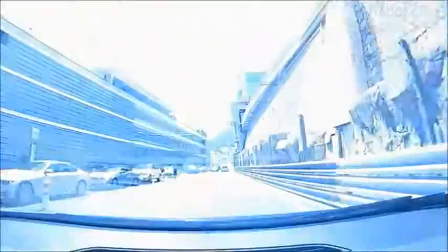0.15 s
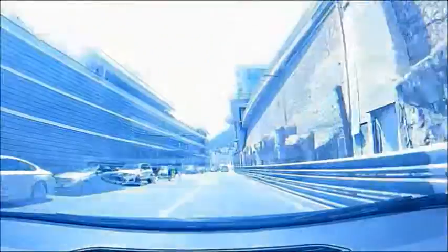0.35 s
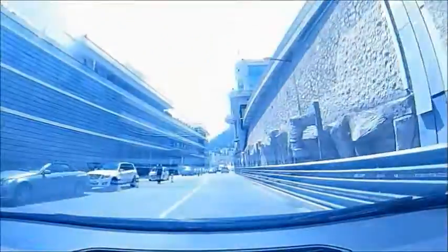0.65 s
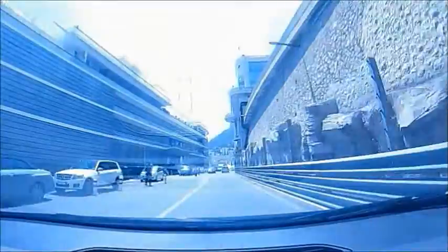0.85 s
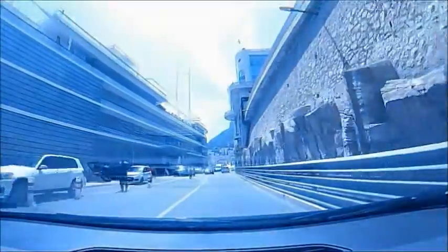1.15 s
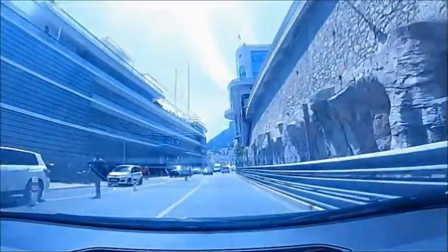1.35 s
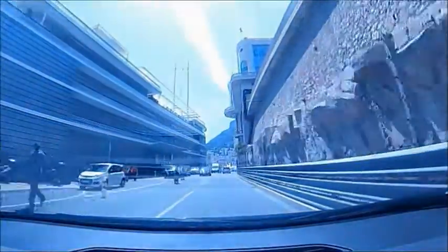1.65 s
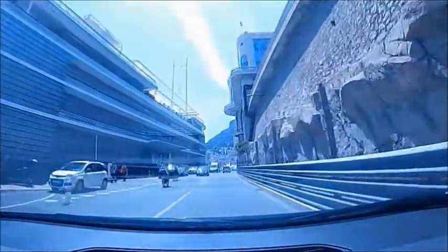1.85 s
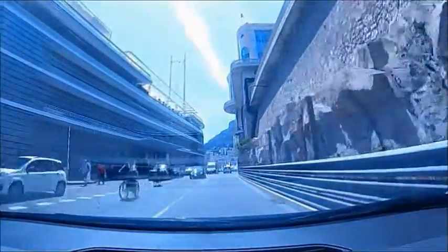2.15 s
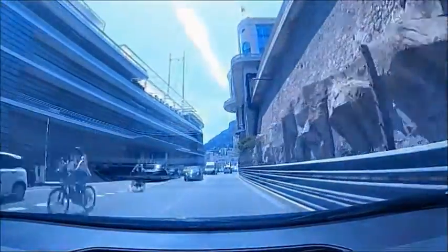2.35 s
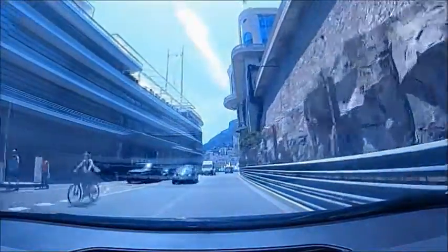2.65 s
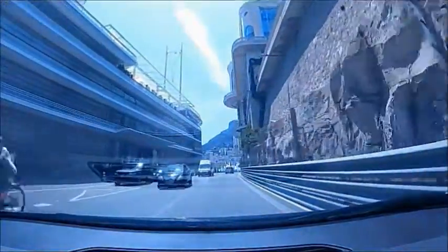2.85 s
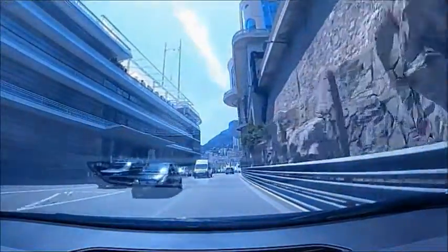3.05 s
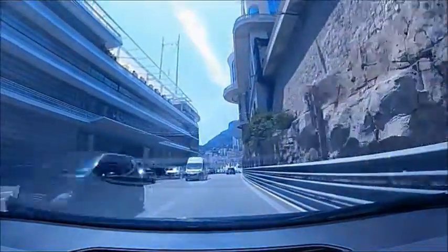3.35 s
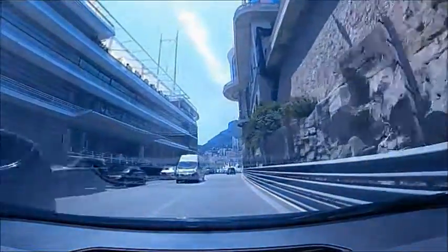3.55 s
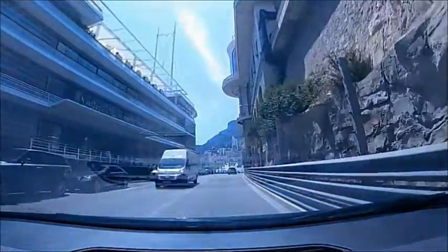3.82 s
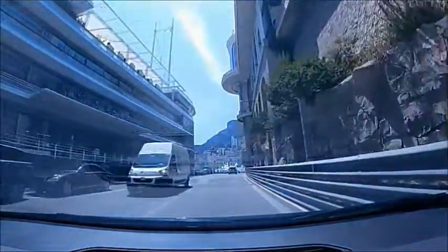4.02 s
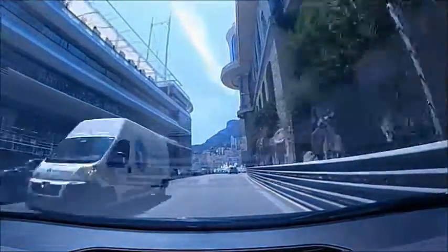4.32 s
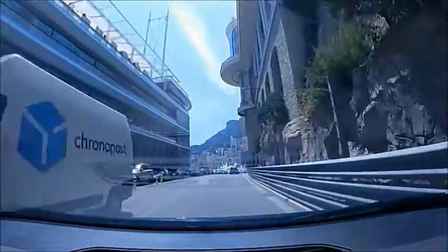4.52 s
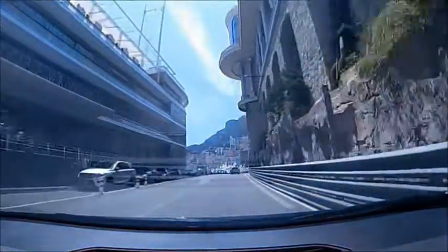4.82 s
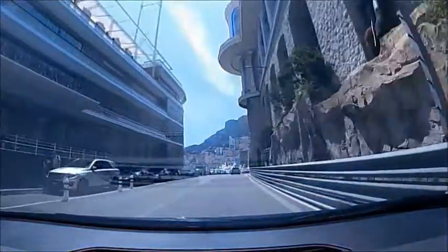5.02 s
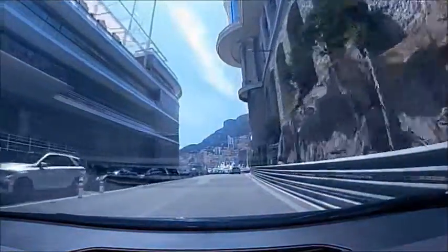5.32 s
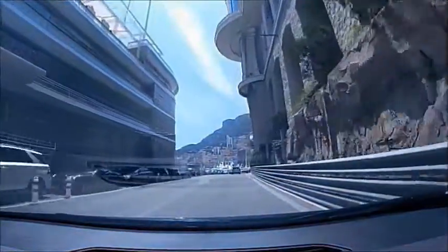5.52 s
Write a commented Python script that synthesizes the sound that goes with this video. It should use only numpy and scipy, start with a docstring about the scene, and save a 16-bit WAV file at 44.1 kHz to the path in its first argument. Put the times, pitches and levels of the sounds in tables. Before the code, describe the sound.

Steady engine hum and tyre rumble in a moving car; bumps thump, something clicks sharply, and later oncoming traffic swishes by.

```python
"""Inside a car cruising along a walled road, microphone on the dashboard. From the start the engine drones,
the body rumbles on its springs, rough asphalt rings wheels and panels, and tyre noise comes in with a faint
whistle of air. In the first second bumps thump, one sharp click sounds as the road noise drops, and the
trim knocks. Oncoming vehicles then swish past, faintly at 1.4 s, clearly near 3.8 s, and last a van at
4.8 s. Just before the end the road noise drops abruptly again."""
import sys
import numpy as np
from scipy import signal
from scipy.fft import rfft, irfft
from scipy.io import wavfile
from scipy.ndimage import map_coordinates

SR = 44100
rng = np.random.default_rng(int(sys.argv[2]) if len(sys.argv) > 2 else 0)


def wrap_up_sound(samples):
    """Save the sound to the file named by the first command line argument, as 16-bit audio."""
    columns = np.atleast_2d(samples).T
    # keep every value between -1 and 1, then stretch to whole-number steps
    tamed = np.clip(columns, -1, 1)
    steps = np.round(tamed * 32767).astype(np.int16)
    wavfile.write(sys.argv[1], SR, steps)


N = 250488
T = np.arange(N) / SR
# glass and door resonances around the microphone: f/Hz, nominal width/Hz, relative level/dB
PANEL_MODES = [(470, 118, 2.5), (612, 100, 1.5), (785, 83, 2.5), (903.4, 62, 2.5), (1047, 77, 2),
               (1254, 86, -3), (1404, 48, -7), (1550, 150, -8.5), (1976, 100, -13.5)]


def undb(db):
    """Decibels to gain."""
    return 10 ** (np.asarray(db) / 20)


def unit(x):
    """Scale to rms 1."""
    return x / np.sqrt(np.mean(x ** 2))


def walk(rate_hz):
    """Slow chance: random levels joined smoothly, spread about 1."""
    return map_coordinates(rng.standard_normal(1024), [T * rate_hz], order=3, mode="wrap")


def swell(t, length):
    """A bell-shaped rise and fall around time t; length is its standard deviation."""
    return np.exp(-.5 * ((T - t) / length) ** 2)


def struck(t, decay_s):
    """A sudden start that dies away."""
    return (T >= t) * np.exp(-np.abs(T - t) / decay_s)


def soften(x, top_hz):
    """Round off the treble."""
    return signal.sosfilt(signal.butter(2, top_hz, fs=SR, output="sos"), x)


def colour(x, points):
    """Filter by a spectrum of (f/Hz, level/dB) points that falls away beyond its ends; rms 1."""
    hz, db = np.transpose(points)
    f = np.maximum(np.fft.rfftfreq(N, 1 / SR), 1)
    gain = undb(np.interp(np.log(f), np.log(hz), db))
    skirts = np.minimum(f / hz[0], 1) ** 2 * np.minimum(hz[-1] / f, 1) ** 2
    return unit(irfft(rfft(x) * gain * skirts, N))


def resonate(x, hz, width_hz):
    """A resonance passed twice, so that its skirts are steep."""
    b, a = signal.iirpeak(hz, hz / width_hz, fs=SR)
    return signal.lfilter(b, a, signal.lfilter(b, a, x))


def grit(spread_db):
    """Countless small contacts of tread and stone, of uneven size."""
    return rng.standard_normal(N) * undb(spread_db * rng.standard_normal(N))


def ring(modes, patchy_db):
    """Resonances shaken by the asphalt, each swelling with its own patches of road; rms 1."""
    return unit(sum(undb(db + patchy_db * walk(7)) * resonate(grit(2.8), hz, 1.83 * width)
                    for hz, width, db in modes))


def engine(start_hz=61.26, sag_hz_per_s=1.08, pickup_at_s=3.87, pickup_length_s=.366, throb_db=.65):
    """The firing rate drones in the cabin; engine speed sags evenly, then picks up to where it was."""
    # engine orders: multiple of the firing rate, relative level/dB
    orders = [(1, -2.5), (2, -28.5), (3, -28.5), (4, -38), (5, -32), (6, -31)]
    # strength of the drone: t/s, level/dB
    drone = [(0, -16.5), (.2, -12.5), (.33, -16), (.6, -16), (.85, -16), (1.0, -20.5), (1.13, -16),
             (1.3, -18.5), (1.55, -15), (2.6, -13), (2.97, -15), (3.25, -19.5), (3.65, -13.5), (3.96, -16),
             (4.3, -20), (4.65, -20.5), (4.9, -27), (5.35, -15.5), (5.68, -20.5)]
    # brief dips of the drone: t/s, depth/dB
    dips = [(3.15, 4), (3.83, 14.5), (4.14, 8)]
    # the third order booms: t/s, length/s, boost/dB
    booms = [(1.467, .1, 15), (3.34, 0.057, 15)]
    hz = start_hz - sag_hz_per_s * T * np.interp(T - pickup_at_s, [0, pickup_length_s], [1, 0])
    phase = 2 * np.pi * np.cumsum(hz) / SR + .0099 * walk(6.6)
    drone_db = np.interp(T, *np.transpose(drone))
    dip_db = sum(depth * swell(t, .043) for t, depth in dips)
    boom_db = sum(boost * swell(t, length) for t, length, boost in booms)
    tone = 0
    for order, db in orders:
        extra_db = throb_db * walk(10) if order == 1 else (order == 3) * boom_db
        tone += undb(db + extra_db) * np.sin(order * phase + rng.uniform(0, 2 * np.pi))
    return tone * np.sqrt(2) * undb(drone_db - dip_db)


def road(rumble_db=-21.8, roar_db=-28.5, rumble_rise_db_per_s=.41, roar_rise_db_per_s=.31):
    """Long waves in the road rock the body; its coarse grain rings the wheels and cabin."""
    # spectrum of the body's sway: f/Hz, relative level/dB
    sway = [(10, -9.5), (17, 2), (24, 8), (34, -1.5), (47, -2), (58, -3.5), (73, -4.5), (85, -13),
            (110, -27.5), (200, -59)]
    # wheel, tyre cavity and panel resonances: f/Hz, nominal width/Hz, relative level/dB
    cabin_modes = [(91.7, 9, 0), (125.8, 15.5, 3), (151.5, 18, -1), (183.7, 21.8, -1.06), (246.4, 27, -6),
                   (304.1, 21.1, -1.5), (330.6, 14, -1), (366.5, 20.7, -3.7)]
    # rough asphalt under the car: t/s, length/s, rumble change/dB, roar change/dB
    patches = [(0.486, 0.16, 4, 1.5), (1.42, 0.12, -1, 3), (2.75, 0.14, 3.5, -1), (5.137, 0.14, 6, 1.1)]
    rumble_patch_db = sum(db * swell(t, length) for t, length, db, _ in patches)
    roar_patch_db = sum(db * swell(t, length) for t, length, _, db in patches)
    down_db = lull(recovery_s=1.86)
    rumble_gain = undb(rumble_db + rumble_rise_db_per_s * T + rumble_patch_db - .31 * down_db)
    roar_gain = undb(roar_db + roar_rise_db_per_s * T + roar_patch_db - .87 * down_db)
    rumble = colour(rng.standard_normal(N), sway)
    roar = ring(cabin_modes, patchy_db=1)
    return rumble * rumble_gain + roar * roar_gain


def tyres(roll_db=-39.5, hiss_db=-49, roll_rise_db_per_s=.5, hiss_rise_db_per_s=.566, flutter_db=.25):
    """Tread noise comes back off the walls, rings glass and doors, and flutters with the surface."""
    # air and tread hiss heard through the window: f/Hz, relative level/dB
    hiss_spectrum = [(600, 0), (1500, -5), (1790, -0.5), (2150, 1.5), (3000, -5), (4300, -10),
                     (4900, -14.5), (5900, -15), (6500, -13), (7100, -18.5), (9000, -23), (10100, -31),
                     (11300, -28.5), (14000, -35.5)]
    # stretches where the walls throw back more: t/s, length/s, roll boost/dB, hiss boost/dB
    walls = [(1.907, .2, 0.1, 0), (2.7, .79, 1.4, 0.7)]
    roll_wall_db = sum(db * swell(t, length) for t, length, db, _ in walls)
    hiss_wall_db = sum(db * swell(t, length) for t, length, _, db in walls)
    down_db = lull(recovery_s=3.37)
    roll_gain = undb(roll_db + roll_rise_db_per_s * T + roll_wall_db - .92 * down_db)
    hiss_gain = undb(hiss_db + hiss_rise_db_per_s * T + hiss_wall_db - down_db)
    roll = ring(PANEL_MODES, patchy_db=.73)
    hiss = colour(grit(2.6), hiss_spectrum)
    return (roll * roll_gain + hiss * hiss_gain) * undb(flutter_db * walk(35))


def whistles(steady_db=-73):
    """Narrow bands sing: a steady one of air slipping past the window edge, and brief ones; the band at 1.42 s
    comes with the vehicle passing at 1.4 s, and the lowest, at 4.08 s, with the van's approach."""
    # brief whistles: t/s, level/dB, length/s, f/Hz, width/Hz
    brief = [(1.42, -65, .08, 6400, 2200), (2.9, -61, .04, 6450, 700), (3.3, -63, .06, 6500, 1000),
             (3.32, -74, .055, 11200, 2200), (3.91, -57.5, .07, 6350, 1200), (4.08, -54, .08, 3290, 280)]
    air = undb(steady_db) * unit(resonate(rng.standard_normal(N), hz=6450, width_hz=380))
    for t, db, length, hz, width in brief:
        air += undb(db) * swell(t, length) * unit(resonate(rng.standard_normal(N), hz, width))
    return air


def bumps():
    """The suspension softens each bump into a few swings of cabin pressure."""
    # bumps under the wheels: t/s, peak level/dB, f/Hz, length/s
    jolts = [(0.473, -12.5, 28.5, 0.032), (0.502, -16.5, 94.4, 0.024), (0.712, -4, 57.4, 0.0076),
             (0.75, -9, 37.3, 0.04)]
    return sum(-undb(db) * swell(t, length) * np.cos(2 * np.pi * hz * (T - t))
               for t, db, hz, length in jolts)


def lull(recovery_s, fall_s=.011):
    """The road noise drops abruptly and creeps back: dB down, in full for the hiss, less for the rest."""
    # drops: t/s, depth/dB
    drops = [(0.647, 5.5), (5.439, 5.5)]
    return sum(db * np.interp(T - t, [0, fall_s, recovery_s], [0, 1, 0]) for t, db in drops)


def click(db=-16.5):
    """One dry click: a sudden step that dies at once."""
    return undb(db) * soften(struck(t=.648, decay_s=.0012), top_hz=7200)


def knock(db=-31):
    """Jolted by a bump, the trim rattles briefly against the panels."""
    rattle = ring(PANEL_MODES, patchy_db=0) * struck(t=.741, decay_s=.0074)
    return undb(db) * soften(rattle, top_hz=2500)


def traffic(buffet_db=.4):
    """Oncoming tyres swish and roar, swelling as they draw level with the side window."""
    # passing vehicles, each swish with a sharp edge band and a duller roar: t/s, swish level/dB,
    # approach/s, fade/s, edge f/Hz, edge width/Hz, edge re swish/dB, roar re swish/dB
    passes = [(1.385, -56.8, .01, .06, 4100, 1500, -1, -12), (3.5, -58, .35, .12, 3300, 2600, 2.5, 2),
              (3.738, -42.2, .019, .095, 2440, 700, -1.5, -3),
              (3.824, -45.5, .013, .026, 3300, 2600, -1.5, -2),
              (4.772, -40.4, .078, .19, 3400, 2600, -7, 0.5)]
    # their swish as heard in the cabin: f/Hz, relative level/dB
    swish_spectrum = [(500, 4), (1400, 10), (2400, 7.5), (3200, 2), (4250, 2.5), (4950, -6.5), (6400, -0.5),
                      (7000, -7.5), (8500, -18.5), (10000, -22), (11200, -25), (14000, -39)]
    swish = colour(grit(3.8), swish_spectrum)
    roar = unit(resonate(grit(3.3), hz=1060, width_hz=670))
    vehicles = 0
    for t, db, approach, fade, edge_hz, edge_width, edge_db, roar_db in passes:
        distance = (T - t) / np.where(T < t, approach, fade)  # along the road, 0 when alongside
        edge = undb(edge_db) * unit(resonate(grit(3.5), edge_hz, edge_width))
        vehicles += (swish + edge + undb(roar_db) * roar) * undb(db) / (1 + distance ** 2)
    return vehicles * undb(buffet_db * walk(66))


def scene():
    """Everything as it meets behind the windscreen, in mono."""
    return (engine() + road() + tyres() + whistles() + bumps() + click() + knock() + traffic())[None]


def record(dry, top_hz=14200):
    """The dashboard microphone cuts the top treble steeply."""
    return signal.sosfilt(signal.ellip(8, .2, 80, top_hz, fs=SR, output="sos"), dry)


dry = scene()
out = record(dry)
wrap_up_sound(out)
```